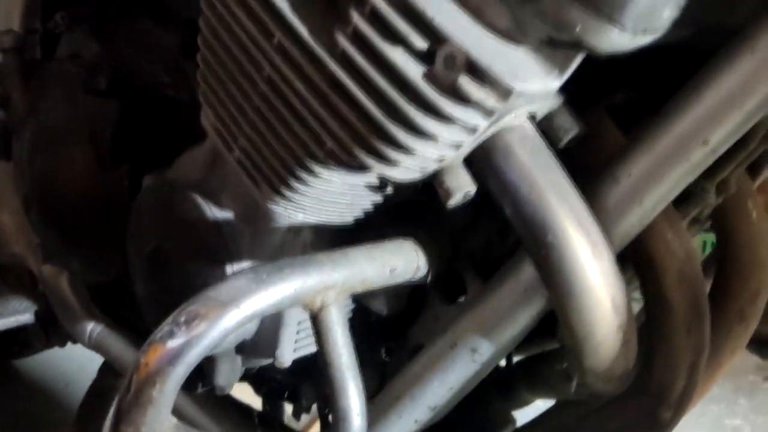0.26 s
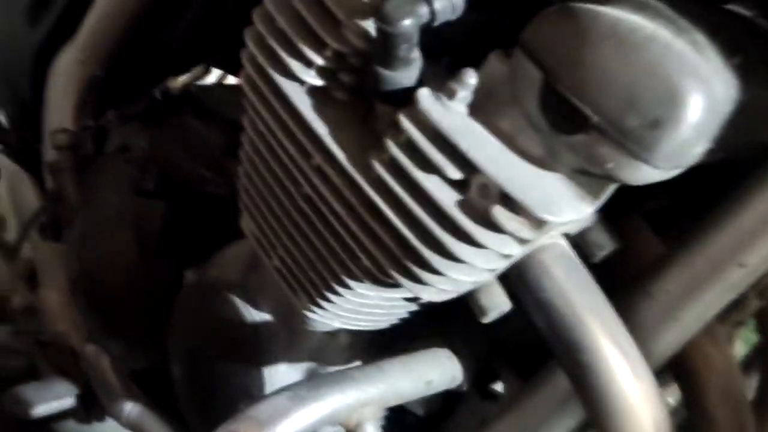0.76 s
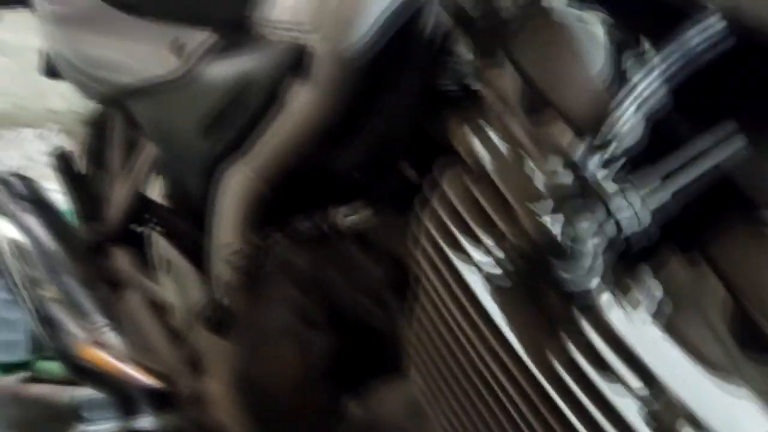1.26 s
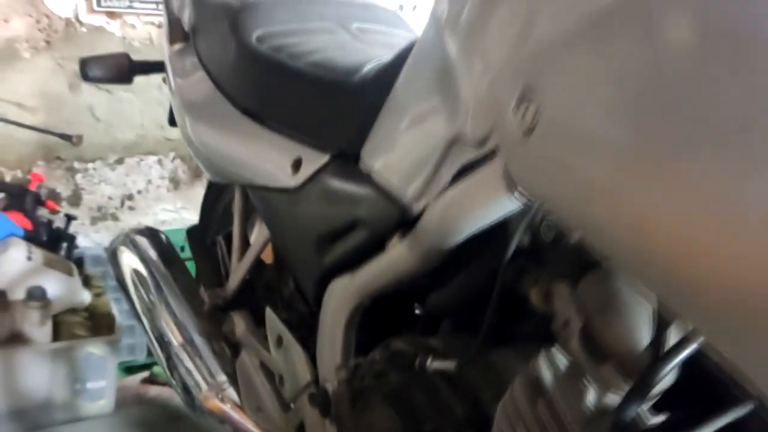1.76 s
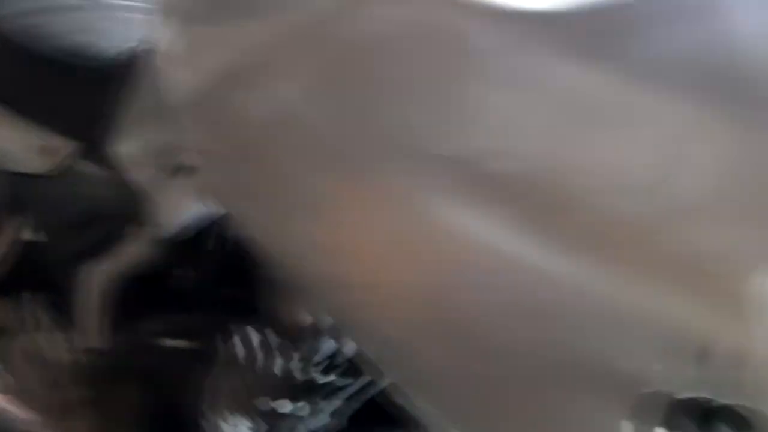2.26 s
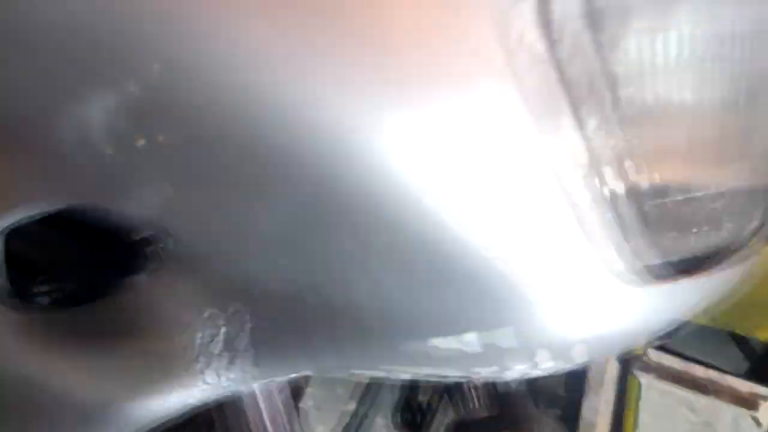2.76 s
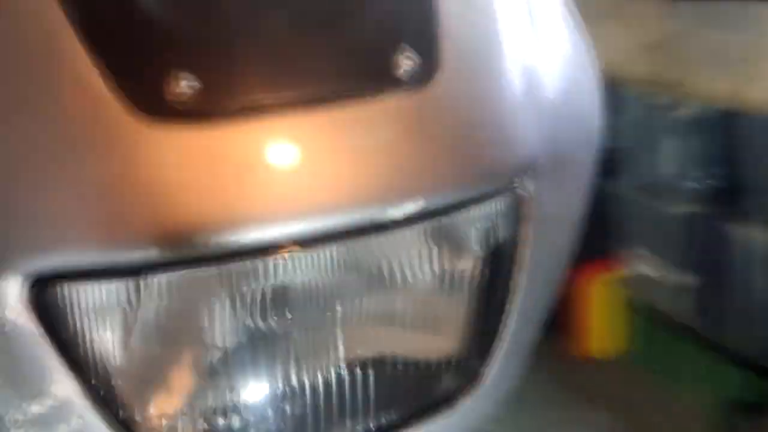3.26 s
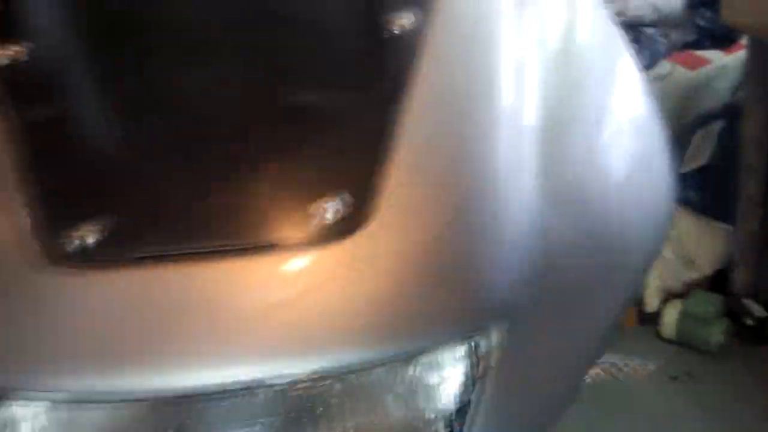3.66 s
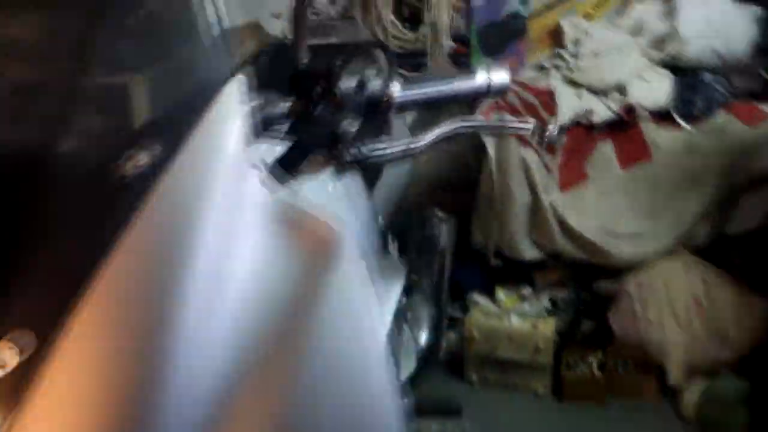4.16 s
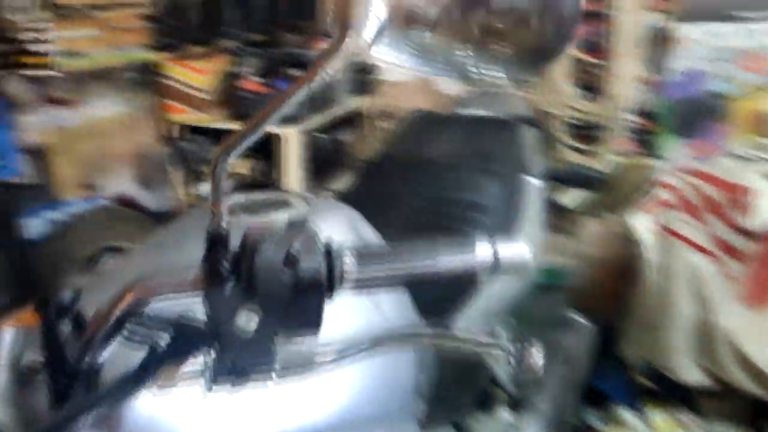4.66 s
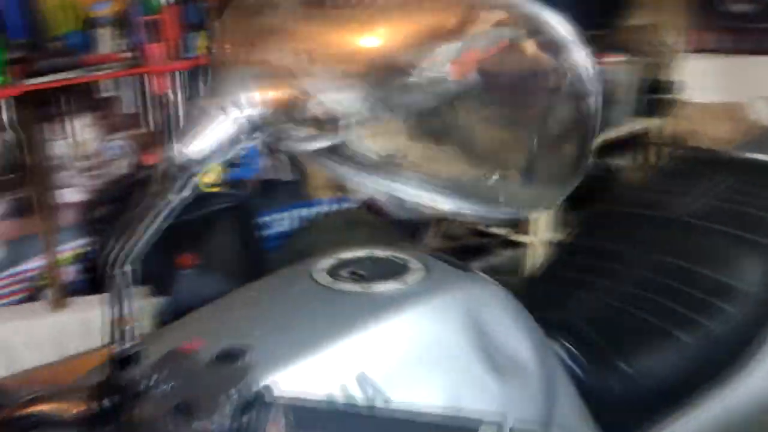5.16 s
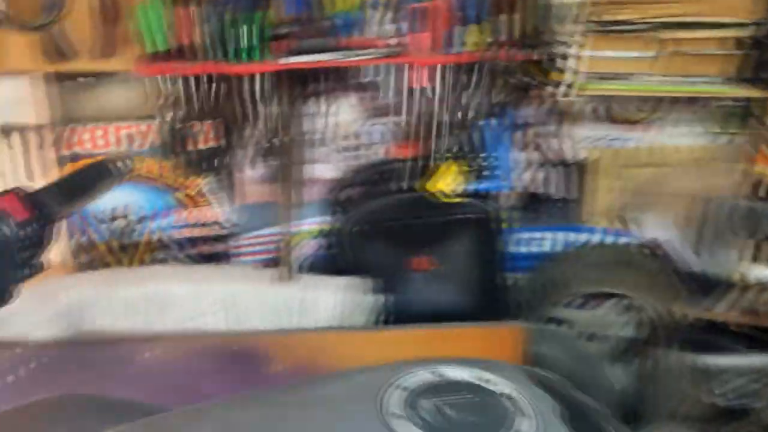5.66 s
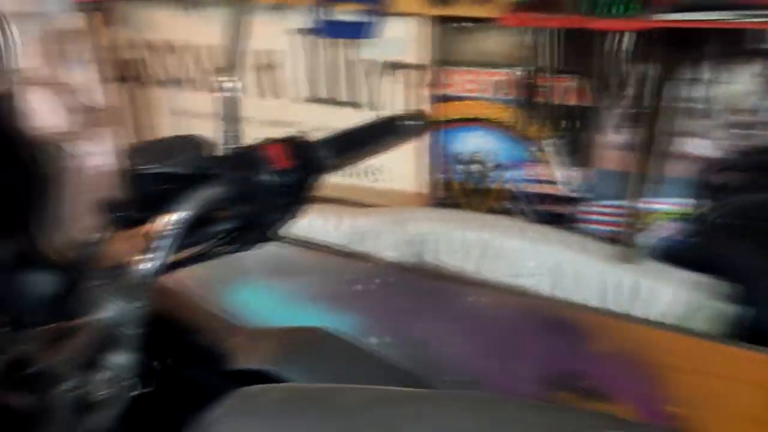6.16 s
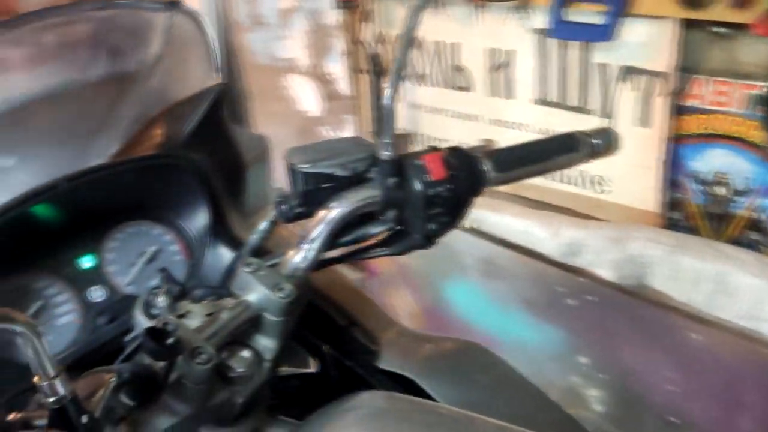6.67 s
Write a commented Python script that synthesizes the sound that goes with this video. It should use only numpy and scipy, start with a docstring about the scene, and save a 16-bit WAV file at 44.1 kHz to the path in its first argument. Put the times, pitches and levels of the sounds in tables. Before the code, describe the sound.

A four-cylinder motorcycle is already idling in a cluttered, enclosed garage and runs throughout, at roughly 800 rpm, hunting slightly with uneven firings. From 0 to 2 seconds the stereo microphones are close to the cooling fins: hard valve taps come thickly, about twenty a second at most and often fewer, jumping left and right over bright, grainy chain and gear whirr. Below lie a deep, wavering exhaust boom in the room, loose rumble and a hollow throbbing roar with occasional harder knocks. After 2 seconds, as the microphones pass the fairing, hard taps become sparse and weaker and the clatter draws back a few decibels, still steady and hissy. From about 4 seconds a low exhaust hum near 55 hertz strengthens while a higher one near 110 fades. The boom peaks around 5.4 seconds, then eases. The idle continues unbroken to the end at 6.9 seconds.

```python
"""A four-cylinder motorcycle idles in a cluttered garage as the microphones pass from the cylinder fins round the fairing.
Throughout, low exhaust orders hunt with the crank and drive a standing wave of the room, over a resonant roar.
At first, hard valve seatings crowd the clatter of valves, chain and gears; after two seconds they thin out
and the clatter recedes. From four seconds on, the fourth exhaust order swells while the eighth fades.
Tones follow the crank angle; shaped noise and impulses through resonances make roar, clatter and rumble."""
import sys
import numpy as np
from scipy import signal
from scipy.fft import rfft, irfft, next_fast_len
from scipy.io import wavfile
from scipy.ndimage import uniform_filter1d

SR = 44100
rng = np.random.default_rng(int(sys.argv[2]) if len(sys.argv) > 2 else 0)


def wrap_up_sound(samples):
    """Save the sound to the file named by the first command line argument, as 16-bit audio."""
    columns = np.atleast_2d(samples).T
    # keep every value between -1 and 1, then stretch to whole-number steps
    tamed = np.clip(columns, -1, 1)
    steps = np.round(tamed * 32767).astype(np.int16)
    wavfile.write(sys.argv[1], SR, steps)


N = 304624


# Direct exhaust orders. Each row: multiple of the crank speed, pressure sign (push 1 or pull -1).
DIRECT_ORDERS = [(2, 1), (4, -1), (8, 1)]
# Their levels before weak firings soften them. Each row: time in seconds, level of each order in dB.
DIRECT_LEVELS = [(0, -29.9, -32.5, -30), (.99, -30.6, -34.5, -30.5), (1.97, -29.4, -34.5, -29.5),
                 (2.96, -27, -41, -30.8), (3.6, -26.4, -41.5, -32.3), (4.44, -27.6, -33, -34.8),
                 (5.43, -30.4, -27.7, -38.5), (5.92, -32.1, -26.2, -36.5), (6.91, -32.5, -27, -34.5)]
# Steady higher orders. Each row: multiple of the crank speed, level in dB before weak firings soften it.
FAINT_ORDERS = [(10, -49), (12, -51), (96, -62)]
PUFF_TURN = -.426  # crank angle of the strongest exhaust puff, turns
AHEAD_TURN = .12  # the direct orders run ahead of the boom, turns
WEAK_DB_PER_RPM = .012  # a weak firing also puffs more softly


def direct_orders(turns):
    """Harmonic synthesis: periodic firing radiates tones at multiples of the crank speed."""
    out = np.zeros(N)
    for (order, sign), db in zip(DIRECT_ORDERS, curves(DIRECT_LEVELS)):
        out += sign * amp(db) * order_tone(order, turns + AHEAD_TURN)
    for order, db in FAINT_ORDERS:
        out += amp(db) * order_tone(order, turns)
    sag_rpm = np.minimum(uneven_firings()[0], 0)
    return out * amp(WEAK_DB_PER_RPM * sag_rpm)


def order_tone(order, turns):
    """Phase locking: a tone of rms 1 follows a multiple of the crank angle."""
    return np.sqrt(2) * np.cos(2 * np.pi * order * (turns - PUFF_TURN))


# Orders that excite the room mode. Each row: multiple of the crank speed, delay in ms.
BOOMING_ORDERS = [(5, 0), (6, 0), (7, 1.9)]
# Level each would have on the resonance. Each row: time in seconds, level of each booming order in dB.
BOOM_LEVELS = [(0.0, -14.85, -11.45, -13.7), (0.49, -21.2, -6.34, -39.76), (0.99, -20.12, -15.46, -22.43),
               (1.48, -14.97, -9.98, -12.59), (1.97, -17.83, -10.52, -27.4), (2.47, -15.4, -6.73, -9.73),
               (2.96, -17.5, -8.0, -18.51), (3.46, -26.81, -6.64, -9.58), (3.95, -27.64, -8.95, -45.18),
               (4.44, -33.24, -6.28, -39.17), (4.94, -45.2, -5.35, -45.17), (5.43, -45.23, -4.79, -16.05),
               (5.92, -30.09, -7.86, -42.02), (6.42, -29.85, -12.53, -44.7), (6.91, -29.68, -15.91, -12.41)]
BOOM_HZ, BOOM_WIDTH_HZ = 77.79, 5.1
# constant added to the room mode's response, like the tail of a higher mode; the mode's peak is 1
MODE_TAIL = -.075 + .12j


def standing_wave(turns):
    """Driven resonance: the room mode lags the hunting speed and beats with it."""
    push = np.r_[np.ones(SR), amp(uneven_firings()[1])]
    # the engine was already running for a second
    before = turns[0] + np.arange(-SR, 0) * (turns[1] - turns[0])
    running = np.r_[before, turns]
    garage = lambda hz: resonance(BOOM_HZ, BOOM_WIDTH_HZ)(hz) + MODE_TAIL
    out = np.zeros(N)
    for (order, late_ms), db in zip(BOOMING_ORDERS, curves(BOOM_LEVELS)):
        wave = filtered(push * order_tone(order, running), garage)
        start = SR - round(late_ms * SR / 1000)
        out -= amp(db) * wave[start:][:N]  # the microphones stand on the far side of the node
    return out


# Low tones between the ports. Each row: time in seconds, left-right level in dB, lag of the left in ms.
PORT_SWAY = [(0.0, 1.0, .38), (1.2, 1, .36), (2.67, 0.5, .15), (3.38, -0.5, .12), (4.87, 1.0, .12),
             (5.7, .2, .02), (6.46, -0.5, -.15), (6.91, -0.5, -.25)]


def exhaust(turns):
    """Superposition: direct orders add to the standing wave; the ports differ in level and arrival time."""
    out = direct_orders(turns) + standing_wave(turns)
    pan_db, lag_ms = curves(PORT_SWAY)
    late, k = lag_ms * SR / 2000, np.arange(N)  # half the lag to each port, in samples
    pair = np.array([np.interp(k - late, k, out), np.interp(k + late, k, out)])
    return pair * amp([pan_db / 2, -pan_db / 2])


# Base idle speed, before uneven firings. Each row: time in seconds, crank speed in rpm.
IDLE_SPEED = [(0.0, 780.7), (0.99, 843.7), (1.97, 773.8), (2.96, 836.4), (3.95, 847.3), (4.94, 782.8),
              (5.92, 791.1), (6.91, 793.9)]
START_TURN = .164  # crank angle at time zero, turns


def crank():
    """Kinematics: the integral of speed gives crank turns at every sample."""
    rpm = curves(IDLE_SPEED)[0] + uneven_firings()[0]
    return START_TURN + np.cumsum(rpm) / (60 * SR)


# Firings that differ from the rest. Each row: start in seconds, greatest gain or loss of speed in rpm,
# greatest change of the push on the standing wave in dB.
UNEVEN_FIRINGS = [(0.003, -39, -2.7), (0.082, 78, 1.2), (0.168, -70, -8.4), (0.244, -74, 0.7),
                  (0.319, -92, -1.1), (0.372, -78, 1.0), (0.438, 22, -6.1), (0.516, 54, -9.9),
                  (0.559, -147, -1.5), (0.601, -40, 13.0), (0.62, 230, -8.6), (0.637, 23, 7.0),
                  (0.718, 16, -11.8), (0.749, -158, 6.0), (0.776, 49, 1.7), (0.834, -5, 3.0),
                  (0.911, -49, 2.7), (0.986, -87, 5.1), (1.115, -52, 3.1), (1.169, 16, -4.2),
                  (1.279, -88, 3.4), (1.392, -55, -0.5), (1.534, -19, -1.7), (1.643, 17, 1.5),
                  (1.812, 142, -2.0), (1.875, -50, 4.4), (2.079, 36, -6.4), (2.177, -56, -0.7),
                  (2.268, 43, -2.9), (2.436, -50, -1.2), (2.633, -29, 0.6), (2.778, -64, 1.7),
                  (2.937, -40, 1.0), (3.043, 12, -1.6), (3.129, -22, -10.5), (3.228, -108, -3.4),
                  (3.355, 21, -1.0), (3.427, -10, -5.1), (3.513, -128, -5.9), (3.691, 28, 1.4),
                  (3.777, -76, -8.2), (3.846, -46, 3.2), (3.938, -27, 1.3), (4.26, -132, -8.5),
                  (4.479, 104, 2.7), (4.541, -47, -6.4), (4.766, 77, -0.9), (4.857, -41, -4.2),
                  (5.067, 65, 1.3), (5.196, 27, 0.5), (5.366, 6, -7.8), (5.544, 56, 1.3), (5.799, 59, 2.8),
                  (5.902, -22, 0.1), (5.969, 55, 3.0), (6.135, 102, 4.2), (6.308, -66, 3.1),
                  (6.394, 8, -2.2), (6.488, -203, -1.7), (6.519, 110, 5.2), (6.656, -116, 4.1),
                  (6.767, 95, 6.9)]
KICK_S, SETTLE_S = .0511, .0389  # time constants of the pull and of the flywheel evening it out


def uneven_firings():
    """Impulse response of a flywheel: each firing briefly shifts speed (rpm) and push (dB)."""
    u, kicks = np.arange(SR // 2) / SR, np.zeros((2, N))
    pull = (1 - np.exp(-u / KICK_S)) * np.exp(-u / SETTLE_S)
    for s, *gains in UNEVEN_FIRINGS:
        kicks[:, round(s * SR)] = gains
    return signal.fftconvolve(kicks, [pull / pull.max()], axes=1)[:, :N]


# Relative noise spectrum of the valve gear. Each row: frequency in Hz, density in dB per Hz.
METAL_SPECTRUM = [(900, -27), (1300, -0.5), (1650, -1.5), (2250, -1), (3000, -1.5), (4000, -1.5),
                  (5300, -1.5), (5800, -1.5), (6600, -1), (7500, -5.5), (10000, -6.5), (13000, -6.5),
                  (14100, -8), (14400, -36)]
# Modes of the cooling fins. Each row: centre in Hz, width in Hz, peak gain over the clatter in dB.
FIN_MODES = [(2200, 310, 3), (3560, 45, 3.5), (3950, 75, 3.5), (5310, 310, 3)]
DULL_DB, DULL_GROWS = -1, 1.33  # dull part against the mean clatter level; dB per dB of nearness
WHIRR_DB = -3  # bright part of taps and whirr, against the clatter level


def clatter(turns):
    """Modal decay: taps ring in the fins, then hang in the garage, over a whirr grained by chain links."""
    bright_db, near_db = nearness()
    dull_db = bright_db.mean() + DULL_DB + DULL_GROWS * near_db
    ordinary, hard = taps(turns), hard_seatings()
    links = (rng.random((3, N)) < 260 / SR) * rng.exponential(size=(3, N))  # about 260 links a second

    seatings = uniform_filter1d(ordinary, size=150, axis=1)  # lifter, rocker and valve strike in a cluster
    power = .5 * dying(seatings, 0.29) + 0.091 * dying(seatings, 0.31) + 0.72
    power *= 4.7 + 0.042 * dying(links, 0.021) / dying(links, 0.083).mean()
    level_db = np.array([bright_db + WHIRR_DB, bright_db + WHIRR_DB, dull_db])
    power *= amp(2 * level_db) / power.mean(-1, keepdims=True)
    struck = uniform_filter1d(hard, size=70, axis=1, origin=25)  # a hard seating lands over a moment
    power += 0.98 * dying(struck, 0.18) + 0.21 * dying(struck, 0.028)

    above = lambda hz: 1 / (1 + (6300 / (hz + 1)) ** 12)
    fins = lambda hz: 1 + sum((amp(db) - 1) * resonance(c, w)(hz) for c, w, db in FIN_MODES)
    bright = unit(filtered(rush(METAL_SPECTRUM, patchy_db=1.9), above))
    low = unit(filtered(rush(METAL_SPECTRUM, patchy_db=2.5), lambda hz: (1 - above(hz)) * fins(hz)))
    top = filtered(bright, lambda hz: 1 / (1 + (11800 / (hz + 1)) ** 16))

    dull = np.abs(uniform_filter1d(power[2], 300))  # low notes of a tap build up more slowly
    steady = uniform_filter1d(power[:2], SR // 4)
    # the highest notes die before the garage blurs them, so taps stand out more
    crisp = (np.abs(power[:2]) / steady) ** 0.27
    ringing = np.sqrt(np.abs(power[:2])) * (bright - top + crisp * top)
    return ringing + np.sqrt(dull) * low + contact_ticks(ordinary, hard, links, bright_db)


# Hard seatings. Each row: time in seconds, nominal peak in dB, left-right level in dB.
HARD_SEATINGS = [(0.03, -27, -2), (0.0747, -17.5, -5), (0.1311, -13.5, 3), (0.183, -10.5, -3),
                 (0.2458, -19.5, 12), (0.2862, -18, 4), (0.3292, -17.5, -5), (0.417, -12, -3),
                 (0.455, -16, 4), (0.491, -11.5, 4), (0.5464, -10, -2), (0.6, -13.5, 0), (0.617, -16.5, 0),
                 (0.704, -15, -3), (0.7387, -17, 12), (0.779, -12, 1), (0.83, -16, -3), (0.852, -13, -2),
                 (0.9243, -16.5, 0), (1.005, -10, -6.5), (1.0736, -14, -5), (1.1373, -14.5, -3),
                 (1.192, -11, 0), (1.229, -13, 2), (1.308, -12, -2), (1.383, -12, 5.5), (1.465, -12.5, 1.0),
                 (1.504, -13.5, 3), (1.537, -16, 5), (1.595, -13, -1), (1.6897, -15.5, 14.5),
                 (1.7994, -13.5, 7.5), (1.9465, -21, 10), (2.1586, -22, -9), (2.2953, -16.5, -3),
                 (2.349, -16.5, -5), (2.4046, -21, 6), (2.5202, -17, -2), (2.67, -18.5, -10),
                 (2.9498, -22.5, -19), (2.968, -18, -4), (3.037, -17, -4), (3.248, -23, -15),
                 (3.4111, -17.5, 2.0), (3.636, -18, -4), (3.8427, -19.5, -2), (3.9316, -16.5, 4),
                 (4.4444, -19.5, 7), (4.527, -19, 4), (4.5916, -21.5, 10), (4.735, -17.5, 1),
                 (4.8894, -15.5, -2), (5.037, -20.5, 7), (5.1876, -19, 8), (5.3383, -16.5, 4),
                 (5.4362, -23, 4), (5.576, -19, 1), (5.636, -18.5, -1), (5.787, -16.5, -2),
                 (5.919, -20, -1), (6.2124, -22, 3), (6.5452, -19.5, -1), (6.7027, -17.5, -4),
                 (6.7447, -22, 8), (6.7831, -19, 1), (6.838, -15.5, -2)]
HARD_DB, HARD_DULL_DB = -15.5, -1  # power impulse against the nominal peak; its dull part against that


def hard_seatings():
    """Impact excitation: each hard seating is an impulse of power in left, right and dull part."""
    hard = np.zeros((3, N))
    for s, db, pan_db in HARD_SEATINGS:
        part_db = np.array([pan_db / 2, -pan_db / 2, HARD_DULL_DB])
        hard[:, round(s * SR)] = amp(2 * (db + HARD_DB + part_db))
    return hard


# Ordinary seatings in a cam cycle. Each row: cam angle in turns, relative left, right and dull levels in dB.
VALVE_SEATINGS = [(0.173, 3, -1.5, -2), (.315, -11, -24, -21), (.535, -1, 0, -4), (0.676, 5.5, 5, 1),
                  (.775, -1.5, -3, -10.5), (.915, 3.5, -14, 0.5), (.015, -18, 1, -18)]
VALVE_SCATTER_DB = 1.3  # one ordinary seating against the next
SHARP_DB = 1  # added to every tap against the whirr


def taps(turns):
    """Periodic impact: valves seat once a cam turn, giving power impulses in left, right and dull part."""
    cam, power = turns / 2, np.zeros((3, N))
    cycles = np.arange(np.ceil(cam[-1]))
    loud_at = np.array(HARD_SEATINGS)[:, 0] * SR
    for turn, *part_db in VALVE_SEATINGS:
        luck = rng.standard_normal((len(cycles), 5)).clip(-1.5, 1.5)
        at = np.searchsorted(cam, cycles + turn + 0.0095 * luck[:, 0]).clip(0, N - 1)
        ordinary = np.abs(at[:, None] - loud_at).min(1) > SR // 100  # the hard ones are listed by themselves
        scatter_db = VALVE_SCATTER_DB * luck[:, 1] + 0.29 * luck[:, 2:].T
        power[:, at] += amp(2 * (np.c_[part_db] + scatter_db + SHARP_DB)) * ordinary
    return power


# drive of the first contacts: hard over its power impulse; ordinary and chain link over the clatter level
TICK_DB, TAP_TICK_DB, LINK_TICK_DB = 22, 5, 6


def contact_ticks(ordinary, hard, links, bright_db):
    """Contact mechanics: the first touch is a broad treble impulse ahead of the ringing."""
    contacts = amp(TICK_DB) * np.sqrt(hard[:2])
    contacts += amp(bright_db + TAP_TICK_DB) * np.sqrt(ordinary[:2])
    contacts += amp(bright_db + LINK_TICK_DB) * links[:2] / 2
    return filtered(contacts, lambda hz: resonance(12300, 7000)(hz) ** 2)


# Clatter as the microphones draw away from the fins. Each row: time in seconds, reference level in dB.
CLATTER_LEVEL = [(0.0, -31), (0.35, -31.5), (0.6, -31.5), (1.36, -32), (2.1, -33), (2.69, -34),
                 (3.2, -34.5), (4.6, -35), (5.08, -34.5), (6.04, -35.5), (6.91, -34.5)]


def nearness():
    """Distance law by table: clatter level and how far it lies over its mean, dB."""
    db, = curves(CLATTER_LEVEL)
    return db, db - db.mean()


# Garage and case resonances. Each row: centre in Hz, nominal width in Hz, base level in dB,
# growth in dB per dB of nearness, time of the loudest spot in seconds, its spread in seconds, its swell in dB.
RING_MODES = [(129, 46, -41, 2.8, 5.9, 1.6, 5), (194, 73, -46.5, 3, 3.45, 1.54, 6.5),
              (276.7, 48, -44, 0, 5.85, 0.89, 3.5), (388, 86, -45, 1.2, 1.3, 0.66, 1),
              (479, 34, -47.5, 1.6, 5.52, 0.24, 6.5), (516, 41, -55, 2.3, 2, 0.21, 14.5),
              (552, 31, -54.5, -0.5, 2.8, 0.68, 11), (526.6, 30, -54, 1.5, 4.13, 0.7, 16.5),
              (504, 15, -59.5, 3.5, 4.54, 0.14, 20), (578, 35, -48, 2, 5.3, 0.29, 8.5),
              (645.4, 23, -47.5, 2, 0.83, 0.58, 3), (700, 78, -49, 2, 1.06, 0.3, 8.5),
              (775, 30, -61, -5, 3.05, 0.29, 7), (781, 133, -48, 2.5, 4.06, 1.6, 5.5),
              (1072, 210, -43.5, 1.24, 6.8, 1.1, 3.5), (956, 110, -55.5, -2.5, 2.64, 0.38, 9.5)]
THROB_LAG_S_PER_KHZ = 0.016  # higher resonances throb later
BODY_PAN_DB = 0.6  # the roar leans to the left port


def body(turns):
    """Source-filter principle: silencer and crankcase roar in resonances that swell as the microphones pass."""
    throb, knock = firing_throb(turns), firing_knock(turns)
    out = np.zeros((2, N))
    t, near_db = np.arange(N) / SR, nearness()[1]
    for hz, width_hz, level_db, grows, at_s, for_s, swell_db in RING_MODES:
        db = level_db + grows * near_db + swell_db * np.exp(-.5 * ((t - at_s) / for_s) ** 2)
        source = rush([(100, 0)], patchy_db=3.0) + knock
        roar = filtered(source, lambda f: resonance(hz, width_hz)(f) ** 1.245)
        lagged = np.roll(throb, round(THROB_LAG_S_PER_KHZ * hz * SR / 1000))
        out += amp(db + 0.75 * lagged) * unit(roar)
    return out * amp([[BODY_PAN_DB / 2], [-BODY_PAN_DB / 2]])


def firing_throb(turns):
    """Amplitude modulation: the level follows cam, crank and single firings of uneven strength."""
    throb = np.cos(np.pi * (turns - 1.9)) + 0.39 * np.cos(2 * np.pi * (turns - .3))
    fired = np.diff(np.floor(2 * (turns - .1)), prepend=0) > 0  # two firings a crank turn
    strength = amp(7.7 * rng.standard_normal(N))
    puffs = uniform_filter1d(dying(fired * strength, 0.22), size=400)
    return throb + 1.04 * unit(np.log(np.abs(puffs) / puffs.mean() + .5))


# Single hard firings. Each row: start in seconds, burst energy in dB over one sample of the roar's noise.
HARD_FIRINGS = [(.12, 20), (.32, 28), (0.479, 17), (0.598, 28), (.885, 26), (1.187, 30), (1.37, 28),
                (1.498, 28), (2.204, 26), (4.322, 26), (5.409, 28), (6.11, 23), (6.401, 28)]
KNOCK_DB, KNOCK_HZ, KNOCK_TURN = -1.5, 380, .12  # drive before its low-pass, treble limit, crank angle in turns


def firing_knock(turns):
    """Impulsive excitation: low-passed blows at each firing, plus 5 ms noise bursts at hard ones."""
    fired = np.diff(np.floor(2 * (turns - KNOCK_TURN)), prepend=0) > 0
    blows = fired * amp(1.8 * rng.standard_normal(N))
    knock = amp(KNOCK_DB) * filtered(unit(blows), lambda hz: 1 / (1 + 1j * hz / KNOCK_HZ) ** 2)
    n = SR // 200
    for s, db in HARD_FIRINGS:
        knock[round(s * SR):][:n] += amp(db) * rng.standard_normal(n) / np.sqrt(n)
    return knock


# Relative spectrum of the rumble of uneven firing. Each row: frequency in Hz, density in dB per Hz.
DEEP_SPECTRUM = [(12, -16), (30, 2), (42, 9), (58, 7), (72, 8), (82, 8), (95, 7), (118, 2), (135, -16),
                 (150, -50)]
DEEP_DB = -36


def deep_rumble():
    """Random process: uneven firing spreads energy between the orders as low noise."""
    return amp(DEEP_DB) * rush(DEEP_SPECTRUM, patchy_db=-3.0)


# Coherence of the two ports. Each row: frequency in Hz, left-right likeness from -1 to 1.
PORT_LIKENESS = [(30, .4), (60, 0.75), (100, 0.93), (140, .86), (200, 0.94), (370, 0.74), (680, 0.54),
                 (1250, 0.15), (2280, 0.2), (4190, -0.03), (7680, 0.01), (14100, 0.01)]


def rush(spectrum, patchy_db):
    """Partial coherence: mid and side mix shaped noise of rms 1 with patches of random gain."""
    z = signal.stft(rng.standard_normal((2, N)), nperseg=512)[2]
    field = uniform_filter1d(rng.standard_normal(z.shape[1:]), size=5, axis=0)
    field = uniform_filter1d(field, size=6, axis=1)
    pair = signal.istft(z * amp(patchy_db * unit(field)), nperseg=512)[1][:, :N]
    turn = lambda hz: np.arccos(np.clip(along(PORT_LIKENESS, hz), -1, 1)) / 2
    shape = lambda hz: amp(along(spectrum, hz)) * [np.cos(turn(hz)), np.sin(turn(hz))]
    mid, side = filtered(pair, shape)
    return unit(np.array([mid + side, mid - side]))


def resonance(centre_hz, width_hz):
    """Damped oscillator: causal response of one mode, 1 at its centre."""
    return lambda hz: 1j * hz * width_hz / (centre_hz ** 2 - hz ** 2 + 1j * hz * width_hz)


def dying(power, t60):
    """Exponential decay: each impulse of power fades 60 dB in t60 seconds."""
    return signal.lfilter([1], [1, -amp(-120 / (t60 * SR))], power)


def filtered(x, response):
    """Convolution theorem: the spectrum of x times a complex response of frequency."""
    n = x.shape[-1]
    m = next_fast_len(n + SR)
    return irfft(rfft(x, m) * response(np.fft.rfftfreq(m, 1 / SR)), m)[..., :n]


def amp(db):
    """Decibel law: level to amplitude ratio."""
    return 10 ** (np.asarray(db) / 20)


def unit(x):
    """Normalisation to rms 1."""
    return x / np.sqrt(np.mean(x ** 2) + 1e-20)


def along(points, hz):
    """Interpolation of (Hz, value) points on a log frequency axis."""
    f, v = np.transpose(points)
    return np.interp(np.log(hz + 1), np.log(f + 1), v)


def curves(rows):
    """Linear interpolation: one value per sample for each column after the time."""
    s, *cols = np.transpose(rows)
    return [np.interp(np.arange(N) / SR, s, c) for c in cols]


def scene():
    """Superposition of exhaust, clatter, body roar and deep rumble."""
    turns = crank()
    return exhaust(turns) + clatter(turns) + body(turns) + deep_rumble()


# Cavities of the left and right microphone ports. Each row: centre in Hz, width in Hz, peak gain in dB
# before the tilt, treble tilt in dB at the band limit.
PORT_CAVITIES = [(10930, 970, 15, -2.5), (8560, 930, 14, -7.5)]
# Phase between the ports, which lie a little apart. Each row: frequency in Hz, lead of the left in radians.
PORT_LEAD = [(150, 0), (600, 0.1), (3530, -3.1), (7920, -15.6), (11300, -33.5), (14300, -29.7)]
TOP_HZ = 14500  # band limit


def record(dry):
    """Cavity resonance: each port adds its treble peak and tilt; nothing passes above the band limit."""
    def ports(hz):
        return np.array([(1 + (amp(db) - 1) * resonance(c, w)(hz)) * amp(tilt_db * (hz / TOP_HZ) ** 4)
                         for c, w, db, tilt_db in PORT_CAVITIES])

    spacing = lambda hz: np.exp(np.outer([.5j, -.5j], along(PORT_LEAD, hz)))
    return filtered(dry, lambda hz: ports(hz) * spacing(hz) * (hz < TOP_HZ))


dry = scene()
out = record(dry)
wrap_up_sound(out)
```